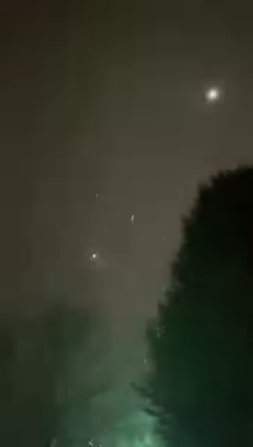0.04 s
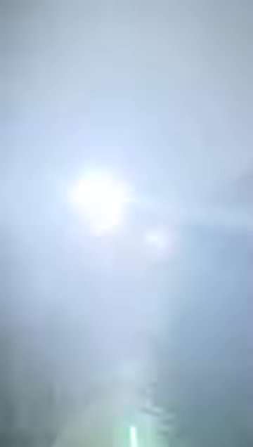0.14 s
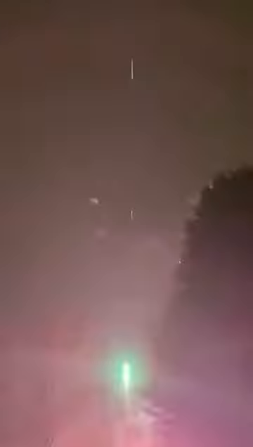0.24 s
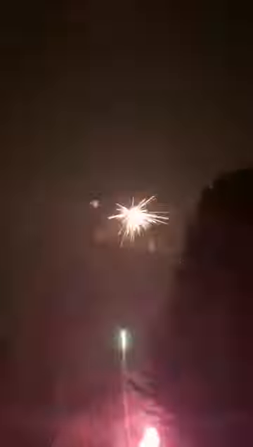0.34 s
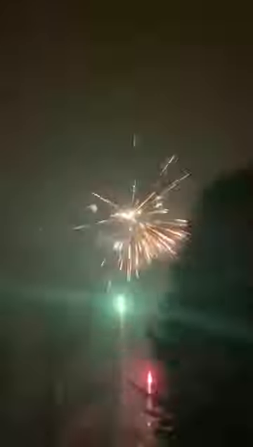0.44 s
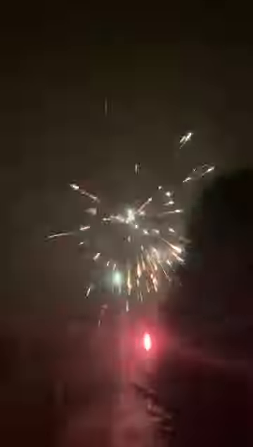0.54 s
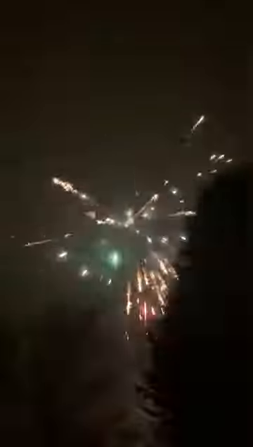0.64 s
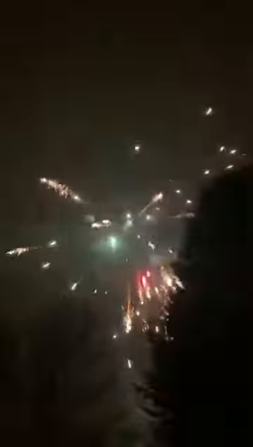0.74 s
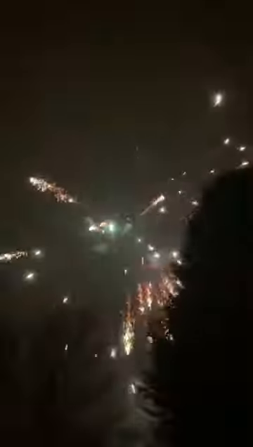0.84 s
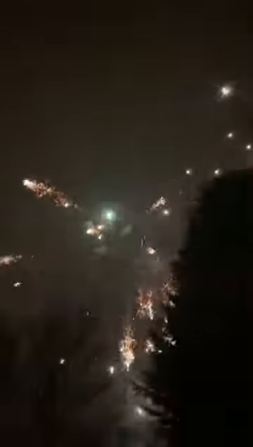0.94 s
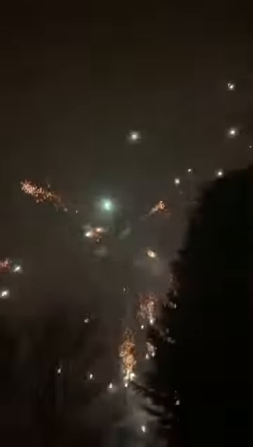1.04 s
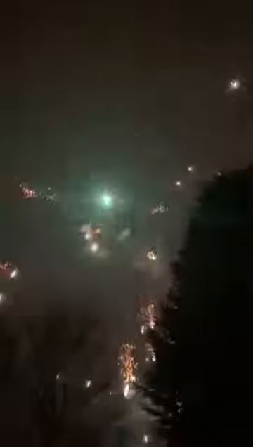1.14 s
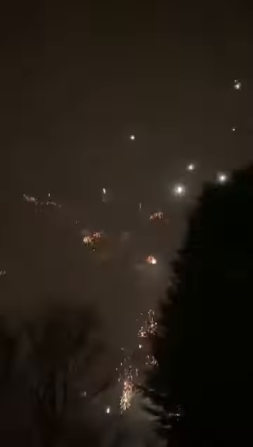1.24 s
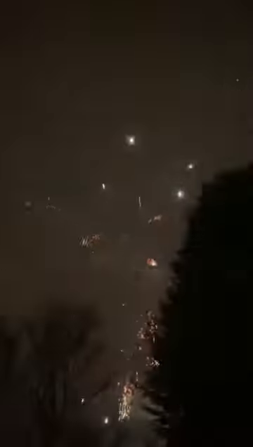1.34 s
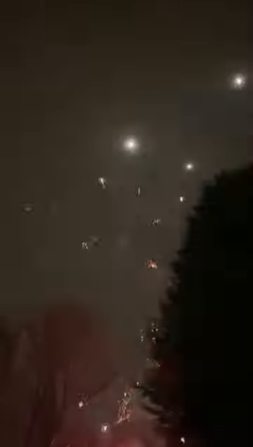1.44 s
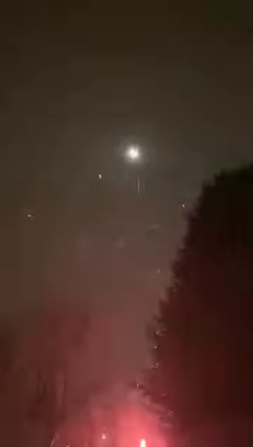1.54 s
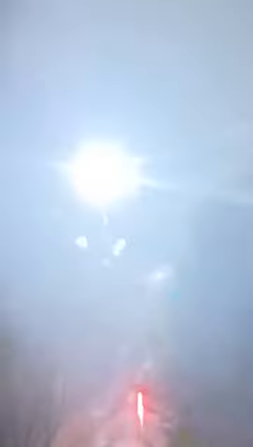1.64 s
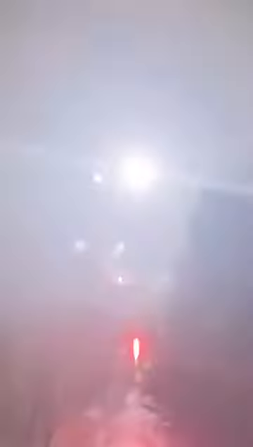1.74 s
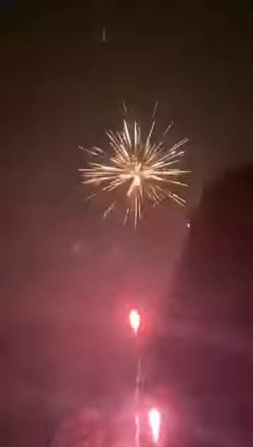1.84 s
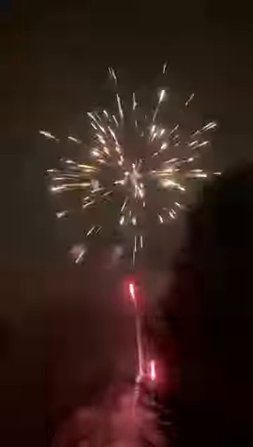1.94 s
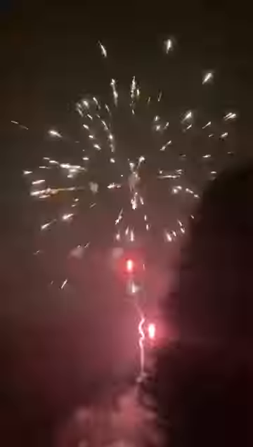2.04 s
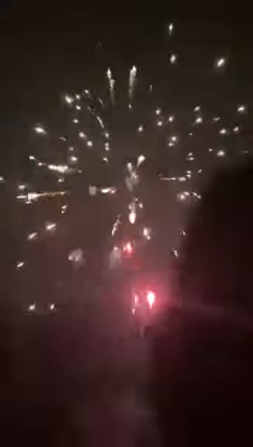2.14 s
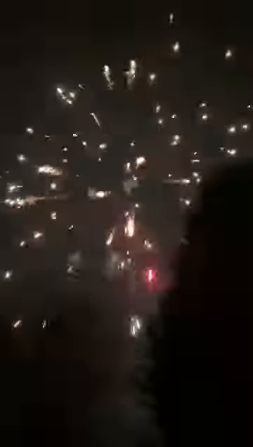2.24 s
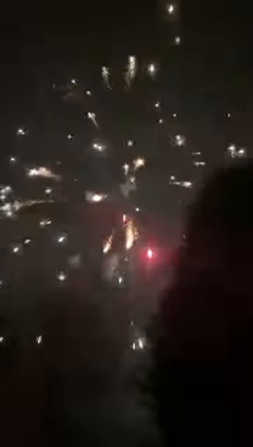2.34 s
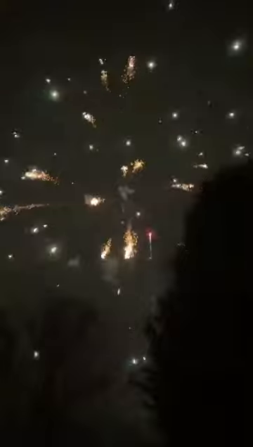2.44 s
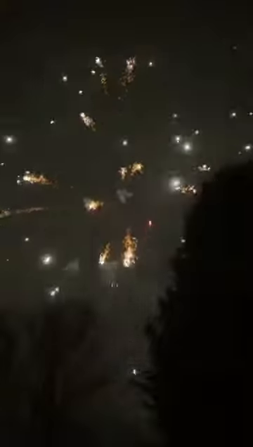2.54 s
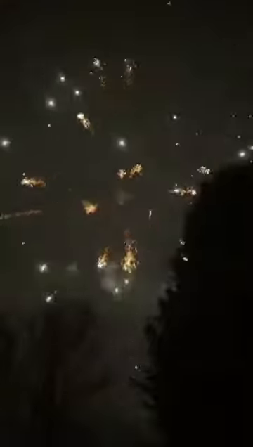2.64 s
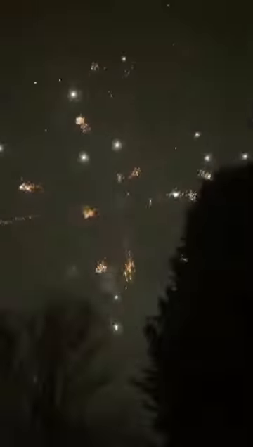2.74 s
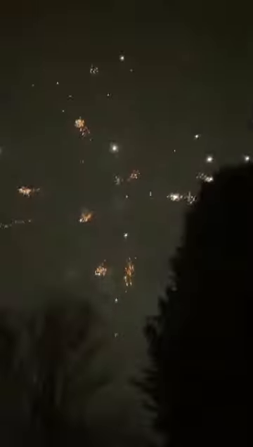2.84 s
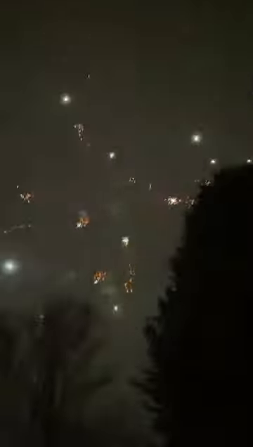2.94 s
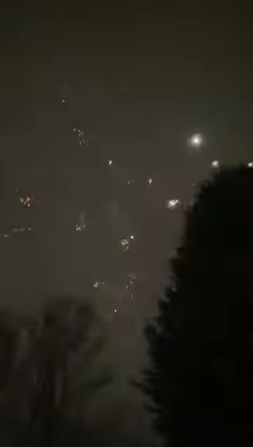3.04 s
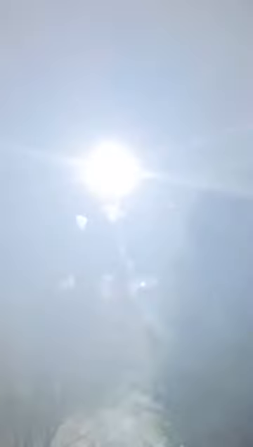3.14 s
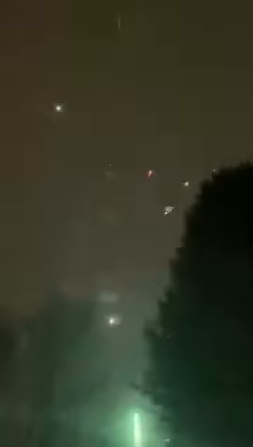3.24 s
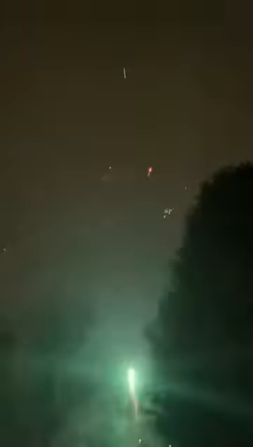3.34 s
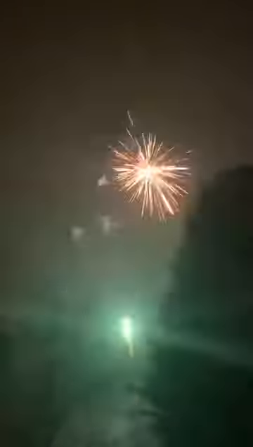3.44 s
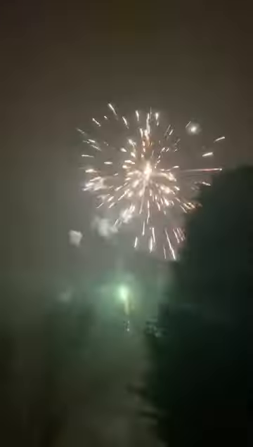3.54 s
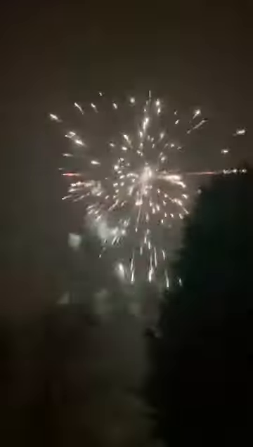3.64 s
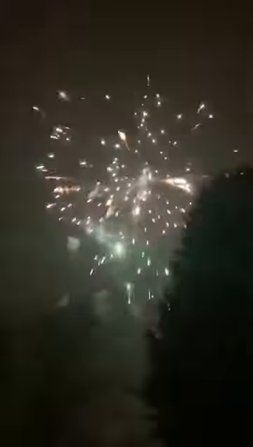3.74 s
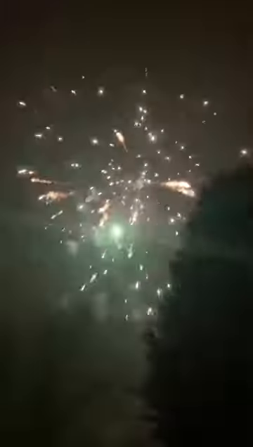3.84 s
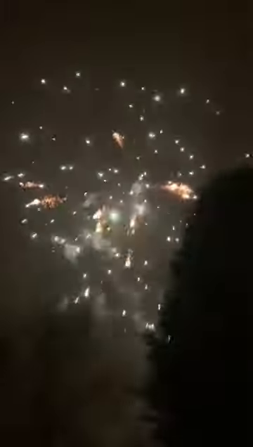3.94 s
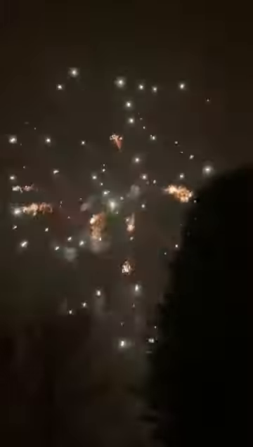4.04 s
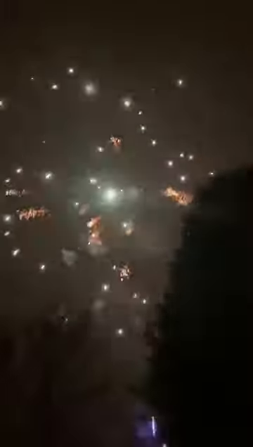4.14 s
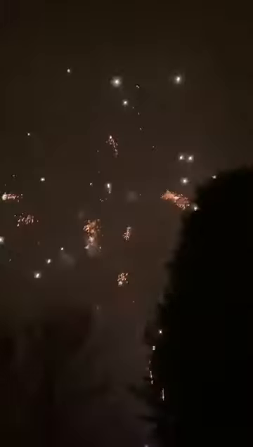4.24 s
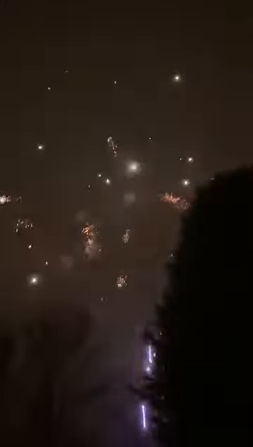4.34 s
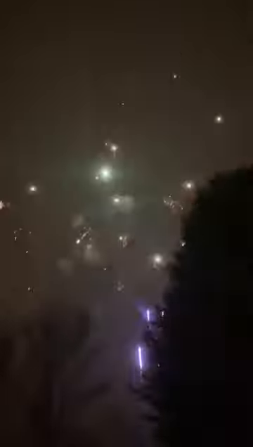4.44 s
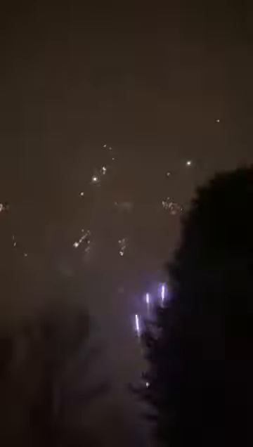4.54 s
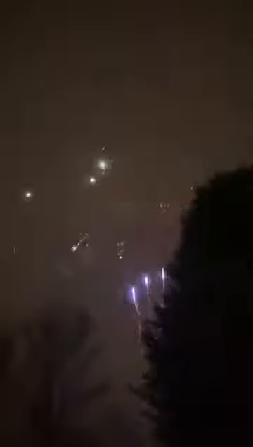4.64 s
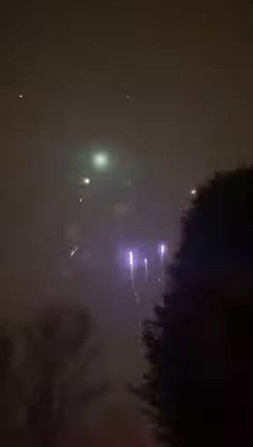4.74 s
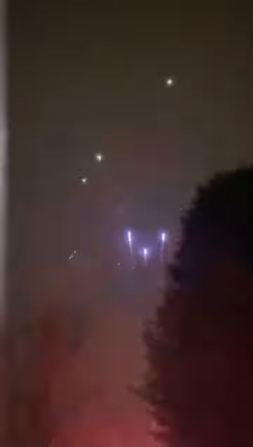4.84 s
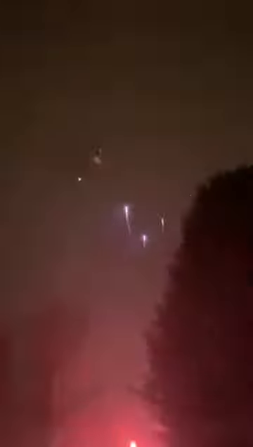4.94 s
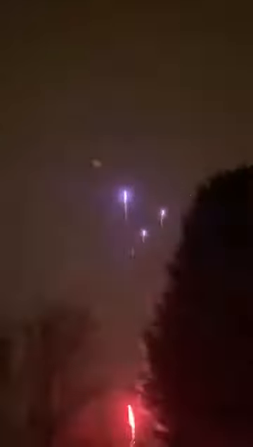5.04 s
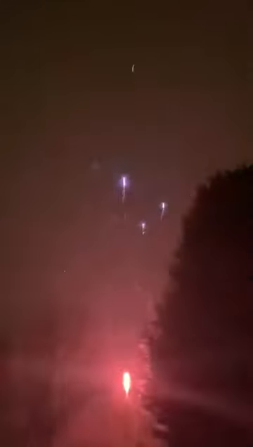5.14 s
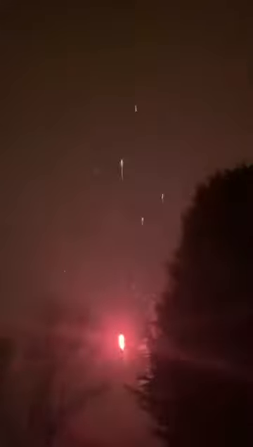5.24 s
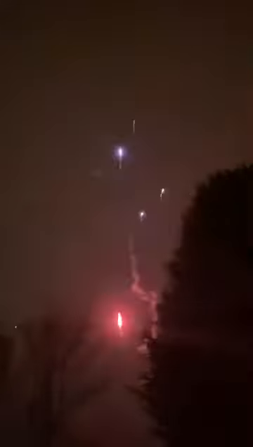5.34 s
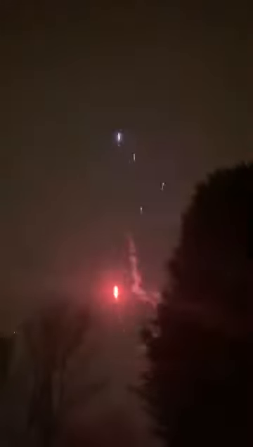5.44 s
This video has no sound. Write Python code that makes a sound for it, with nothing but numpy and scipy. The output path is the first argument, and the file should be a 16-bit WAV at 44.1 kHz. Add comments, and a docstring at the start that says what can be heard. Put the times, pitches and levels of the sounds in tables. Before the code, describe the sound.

Phone recording outdoors among houses and trees: dull launch thumps with short gassy whooshes, and loud, clipped shell bursts mostly in quick twos. Booms and slaps come back from house fronts, with hiss off foliage. Fainter knocking pops fill gaps, dry ticks of burning stars appear mid-way, a flurry of launches precedes the final bang, and two distant pops end it over low rumble.

```python
"""The echo of an earlier burst dies away over a far rumble as a firing tube thumps and a shell bursts overhead.
A night barrage of small fireworks in a garden, heard by a phone with two microphone ports: thumps and bursts
are pressure pulses with reflections, weaker pops come from farther off, burning stars snap as short noise.
Houses and trees throw each blast back as decaying thuds and hiss. The phone's band-splitting filters
smear every blast into a falling chirp."""
import sys
import numpy as np
from scipy import signal
from scipy.fft import rfft, irfft, next_fast_len
from scipy.io import wavfile
from scipy.ndimage import uniform_filter1d

SR = 44100
rng = np.random.default_rng(int(sys.argv[2]) if len(sys.argv) > 2 else 0)


def to_wav(sig):
    """Store sig (one row per channel, or 1-D mono) as 16-bit WAV at the path in sys.argv[1].

    Samples outside -1..1 are clipped; the rate is SR.
    """
    pcm = np.clip(np.atleast_2d(sig), -1, 1) * 32767
    pcm = np.round(pcm).astype(np.int16)
    wavfile.write(sys.argv[1], SR, pcm.T)  # frames by channels


N = 241668

# Hiss off foliage against the thuds off walls. In order: bursts, lifts, pops, each in dB.
LEAVES_DB = [-6.5, -11.5, -18.5]


def amp(db):
    """dB to gain."""
    return 10 ** (np.asarray(db) / 20)


def read(points, hz):
    """Reads a spectrum on a log-frequency axis."""
    f, value = np.transpose(points)
    return np.interp(np.log(hz + 1), np.log(f + 1), value)


def shape(x, gain):
    """Filters by a function of frequency, with padding so that the end does not wrap round."""
    size = next_fast_len(x.shape[-1] + 4096)
    hz = np.fft.rfftfreq(size, 1 / SR)
    return irfft(rfft(x, size) * gain(hz), size)[..., :x.shape[-1]]


def coloured(shared_and_gap, colour):
    """Gives a shared and a differing signal one colour at rms 1, then scales what the spaced ports hear apart."""
    # The differing part against the shared. Each row: frequency in Hz, level in dB.
    port_gap = [(60, -38.5), (140, -64), (240, -22.5), (420, -8), (740, -3.5), (1300, -5), (3000, -1),
                (6000, -5.5), (9000, 3.5), (10500, -43)]
    x = shape(shared_and_gap, lambda hz: amp(read(colour, hz)))
    shared, gap = x / np.sqrt(np.mean(x ** 2, 1, keepdims=True))
    return np.array([shared, shape(gap, lambda hz: amp(read(port_gap, hz)))])


def add(mix, s, sound):
    """Mixes a sound in at time s."""
    part = mix[:, round(s * SR):][:, :sound.shape[1]]
    part += sound[:, :part.shape[1]]


def night():
    """A low rumble of far fireworks: coloured noise whose level wavers by about a dB."""
    # Far rumble before scaling. Each row: frequency in Hz, level in dB.
    rumble = [(18, -36), (30, -4.5), (124, 2), (258, 1), (458, -0.5), (800, -15.5), (3300, -26),
              (6000, -33.5), (11000, -47)]
    rumble_db = -54.5
    swell = uniform_filter1d(uniform_filter1d(rng.standard_normal(N), 2000), 2000)
    level = amp(rumble_db + swell / swell.std())
    return level * coloured(rng.standard_normal((2, N)), rumble)


def echoes(near_db, far_db, leaves_db, spread_db=2.5, per_s=1100, patchy_db=1.0):
    """A quick scatter from the garden, then the far houses: uneven thuds off walls, smooth hiss off foliage."""
    # Thuds off walls. Each row: frequency in Hz, level in dB.
    scatter = [(25, -9.5), (50, -1), (100, 0), (300, 1), (650, -4), (1000, -15.5), (2200, -21), (5000, -43),
               (12000, -74)]
    # Hiss off foliage before scaling. Each row: frequency in Hz, level in dB.
    leaves = [(300, -2), (800, -2.5), (2200, -6), (5000, -10.5), (10000, -21.5), (12000, -16.5)]
    # Treble lost to the air on the way. Each row: frequency in Hz, dB lost per second of travel.
    air_loss = [(200, 8), (1000, 5), (4000, 12.5), (12000, 19)]
    near_t60 = 0.16  # s
    # hedges answer at once and fade fast; the street joins later and rolls away slowly
    hedge_db, hedge_t60 = 3, 0.54  # dB against far_db, s
    street_s, street_rise_s, street_db, street_t60 = 0.11, 0.052, -4.5, 1.88

    t = np.arange(round(1.5 * SR)) / SR
    sign, chance, size = rng.random((3, 2, len(t)))
    sparse = chance < per_s / SR
    taps = np.sign(sign - .5) * sparse * amp(-spread_db * np.log(size + .02))
    thuds = coloured(taps, scatter)
    hiss = amp(leaves_db) * coloured(rng.standard_normal((2, len(t))), leaves)

    hz, frame_s, z = signal.stft(thuds + hiss, SR, nperseg=512)
    # each clump of trees returns its own band for a moment
    patches = uniform_filter1d(rng.standard_normal(z.shape[1:]), size=8, axis=0)
    patches = uniform_filter1d(patches, size=3, axis=1)
    gain_db = patchy_db * patches / patches.std() - read(air_loss, hz)[:, None] * frame_s
    tail = signal.istft(z * amp(gain_db), SR, nperseg=512)[1][:, :len(t)]

    street_rise = np.clip((t - street_s) / street_rise_s, 0, 1)
    street = street_rise * amp(street_db - 60 * (t - street_s) / street_t60)
    far = amp(far_db) * np.hypot(amp(hedge_db - 60 * t / hedge_t60), street)
    near = amp(near_db - 60 * t / near_t60)
    rise = np.minimum(t / .008, 1)
    return tail * np.hypot(near, far) * rise


def earlier_burst(mix):
    """An earlier burst is still dying away: an echo joined 0.3 s after its start."""
    add(mix, 0, echoes(-60, -32.5, -3.0)[:, round(.3 * SR):])


def blast(peak_db, corner_hz, bearing, kind, walls=(), lead=.02, front_s=0.003):
    """A short pressure pulse and its first reflections; arriving aslant, it differs in phase between the ports."""
    # Pulse spectrum before its corners and scaling. Each row: frequency in Hz, level in dB.
    pulse_colour = [(20, -15), (45, 6), (80, 13.5), (300, 13), (1000, 3), (1600, 2.5), (2300, 1.5),
                    (3000, -2), (3800, -1.5), (5000, -1.5), (9000, -2.5), (13000, 5.5)]
    # Port difference of the direct sound, before bearing. Each row: frequency in Hz, level in dB.
    direct_gap = [(60, -44.5), (140, -33.5), (300, -18), (740, -16), (1500, -16.5), (2300, -9), (4000, -14),
                  (6500, -4), (12000, -6)]
    bass_hz, slope, ragged_db = kind
    t, hz = np.arange(8192) / SR, np.fft.rfftfreq(8192, 1 / SR)

    treble_cut = (1 + (hz / corner_hz) ** 2) ** slope
    bass_cut = hz ** 2 / (hz ** 2 + bass_hz ** 2)
    pulse = amp(read(pulse_colour, hz)) / treble_cut * bass_cut
    pulse = pulse * amp(peak_db) / irfft(pulse)[0]

    # turbulence and the nearest surfaces break the front into a spray of small arrivals
    spray = rng.standard_normal((2, len(t))) * np.exp(-t / front_s)
    ragged = amp(ragged_db) * rfft(spray / np.linalg.norm(spray[0])) * hz / np.hypot(hz, 1200)

    duller = 1 / (1 + (hz / (corner_hz * 0.74)) ** 2) ** 0.16
    reflections = sum(sign * amp(db) * np.exp(-2j * np.pi * hz * s) for s, db, sign in walls)
    paths = 1 + ragged + duller * reflections
    # the differing part is turned by nearly a quarter cycle
    gap = np.exp(1.45j) * bearing * 2 * amp(read(direct_gap, hz))
    delay = np.exp(-2j * np.pi * hz * lead)
    return irfft(-pulse * paths * delay * [np.ones(len(hz)), gap])


def fire(mix, s, peak_db, corner_hz, bearing, pulse, walls, near_db, far_db, leaves_db):
    """One blast and what the garden returns of it; echo levels are against the peak."""
    add(mix, s - .02, blast(peak_db, corner_hz, bearing, pulse, walls))  # takes off the pulse's lead
    add(mix, s, echoes(peak_db + near_db, peak_db + far_db, leaves_db))


def puff(colour, db, t60, rise_s):
    """Coloured noise that swells quickly and dies away."""
    t = np.arange(round(.7 * SR)) / SR
    level = amp(db - 60 * t / t60) * np.minimum(t / rise_s, 1) ** 2
    return coloured(rng.standard_normal((2, len(t))), colour) * level


def lifts(mix):
    """Lift charges thump in the tubes: a dull pulse, then hot gas rushing out as noise."""
    # Each row: time in seconds, pulse peak in dB, jet level in dB, jet tilt in dB per octave,
    # far echo in dB against the peak.
    charges = [(0.1402, -14.5, -44.5, 3.5, -21), (1.3562, -17, -40, 2.5, -33),
               (1.6174, -13.5, -39.5, 6.5, -21.5), (3.034, -16.5, -39, 4, -25),
               (3.9376, -13.5, -38, 6.5, -26), (3.9936, -15, -40, 3.9, -41), (4.0409, -18.5, -42, -8, -45),
               (4.093, -24.5, -59, -2, -41), (4.337, -26, -55, -5, -27.5), (4.7031, -19, -43, 2.2, -23.5)]
    # First reflections from ground and walls. Each row: delay in seconds, gain in dB, signed factor.
    lift_walls = [(.0024, -9.5, 0.99), (.0067, -3.5, 0.97), (0.0166, -5, 0.65), (0.0226, -15, 0.87)]
    # Gas jet before tilt and scaling. Each row: frequency in Hz, level in dB.
    jet = [(200, -38), (700, 5), (1300, 10), (3000, -0.5), (6000, -9), (10000, -20), (13000, -16)]
    # In order: bass corner in Hz, treble slope exponent, ragged spray in dB.
    lift_pulse = (70, 1.32, -15.5)
    corner_hz, bearing, near_db, jet_t60 = 400, 0.059, -22, 0.45  # Hz, 0 is straight ahead, dB, s
    for s, peak_db, jet_db, tilt_db, far_db in charges:
        fire(mix, s, peak_db, corner_hz, bearing, lift_pulse, lift_walls, near_db, far_db, LEAVES_DB[1])
        colour = [(hz, level + tilt_db * np.log2(hz)) for hz, level in jet]
        add(mix, s - .001, puff(colour, jet_db, jet_t60, 0.0006))


def bursts(mix):
    """Shells burst overhead: a loud pulse, a deep boom off the street and single slaps off the houses."""
    # Each row: time in seconds, pulse peak in dB, bearing (0 is straight ahead),
    # near scatter in dB against the peak.
    shells = [(0.2056, 10, .95, -29), (0.3991, 9, 1, -29), (1.7039, 10, 0.47, -27),
              (1.8452, 9.5, 0.54, -25.5), (3.2052, 9.5, 0.98, -33), (3.4908, 9.5, 0.8, -27),
              (4.9581, 8.5, 0.55, -28.5)]
    # First reflections from ground and walls. Each row: delay in seconds, gain in dB, signed factor.
    burst_walls = [(.0035, -16.5, 1), (.0085, -16.5, 1), (0.0127, -20, 1), (.017, -14, -0.94),
                   (.024, -33.5, 1), (.032, -39, -0.77)]
    # House fronts, before each slap's own spread. Each row: delay in seconds, level in dB against the burst.
    houses = [(0.152, -36), (.187, -32), (.227, -30.5), (.28, -33.5)]
    # Street boom before scaling. Each row: frequency in Hz, level in dB.
    boom = [(25, -16), (50, 4), (75, -12), (150, -58.5)]
    # Burst and slap, each in order: bass corner in Hz, treble slope exponent, ragged spray in dB.
    burst_pulse = (6.6, 0.74, 0)
    slap_pulse = (30, 1.2, -8)
    corner_hz, far_db = 960, -38
    boom_s, boom_db, boom_t60, boom_rise_s = 0.1025, -53, 0.38, 0.085  # delay, dB against the burst, s, s
    slap_hz, slap_bearing = 700, .3
    slap_spread_s, slap_spread_db = .003, 2.5  # each shell bursts at its own spot

    for s, peak_db, bearing, near_db in shells:
        fire(mix, s, peak_db, corner_hz, bearing, burst_pulse, burst_walls, near_db, far_db, LEAVES_DB[0])
        add(mix, s + boom_s, puff(boom, peak_db + boom_db, boom_t60, boom_rise_s))
        spots = rng.uniform(-1.036, 1, (len(houses), 2))
        for (delay, db), (shift, loud) in zip(houses, spots):
            slap_db = peak_db + db + slap_spread_db * loud
            slap = blast(slap_db, slap_hz, slap_bearing, slap_pulse)
            add(mix, s + delay + slap_spread_s * shift - .02, slap)


def pops(mix):
    """Weaker pops from farther off: a dull pulse, followed by a bright, hollow knock of coloured noise."""
    # Each row: time in seconds, pulse peak in dB, treble corner in Hz, knock level in dB,
    # near scatter in dB against the peak.
    far_pops = [(0.8755, -13, 654, -41, -16), (1.143, -12, 775, -32.5, -23),
                (1.3405, -13, 709, -35.5, -16.5), (4.3229, -19, 505, -42, -17),
                (5.3133, -12, 910, -28.5, -31), (5.401, -16.5, 596, -33, -14.5)]
    # First reflections from ground and walls. Each row: delay in seconds, gain in dB, signed factor.
    pop_walls = [(.0075, -16, -1.2), (.0088, -7.5, 0.91), (0.015, -13.5, 1), (0.073, -11.5, 0.88)]
    # Hollow knock before scaling. Each row: frequency in Hz, level in dB.
    knock = [(500, -17), (1050, 3.5), (1350, 2.5), (1700, -4), (2100, 3), (2600, -15), (3000, 3),
             (3500, -15.5), (6000, -26), (12000, -75)]
    # In order: bass corner in Hz, treble slope exponent, ragged spray in dB.
    pop_pulse = (60, 1, 0)
    bearing, far_db, knock_t60 = .4, -26, 0.058  # 0 is straight ahead, dB, s
    for s, peak_db, corner_hz, knock_db, near_db in far_pops:
        fire(mix, s, peak_db, corner_hz, bearing, pop_pulse, pop_walls, near_db, far_db, LEAVES_DB[2])
        add(mix, s, puff(knock, knock_db, knock_t60, 0.0053))


def crackle():
    """Burning stars snap: clicks of white noise that decay in a fraction of a millisecond."""
    # Each row: time in seconds, starting level in dB.
    snaps = [(1.2499, -40), (2.263, -48), (2.2741, -33.5), (2.321, -31.5), (2.4457, -40.5), (2.482, -44)]
    out, t = np.zeros((2, N)), np.arange(90) / SR
    for s, db in snaps:
        click = amp(db) * np.exp(-t / 0.00042) * rng.standard_normal(len(t))
        add(out, s, click * [[1], [.4]])  # stronger on the left
    return out


def scene():
    """All blasts with their echoes; left and right are the shared part plus and minus the differing part."""
    mix = night() + crackle()
    earlier_burst(mix)
    lifts(mix)
    bursts(mix)
    pops(mix)
    shared, gap = mix
    return np.array([shared + gap, shared - gap])


def record(dry):
    """The finish: the shared treble drops out in one band near 7.5 kHz, then the phone's roll-off,
    all-passes delaying the bass most, overload, band limit."""
    # Crossovers of the band splitter, each in Hz.
    split_hz = [55, 122, 225, 455, 810]
    # Microphone roll-off. Each row: frequency in Hz, gain in dB.
    treble = [(10500, 0.5), (11500, -5.5), (12000, -26), (12800, -33)]
    null_hz, null_width_hz, null_db, edge_hz = 7450, 1000, -30, 12640

    def null(hz):
        """What to add to the shared part so that it drops out in one band."""
        return amp(null_db * np.exp(-((hz - null_hz) / null_width_hz) ** 4)) - 1

    def phone(hz):
        """Roll-off, and one second-order all-pass for each crossover."""
        pole = np.prod([f ** 2 - hz ** 2 + 1j * np.sqrt(2) * f * hz for f in split_hz], axis=0)
        return amp(read(treble, hz)) * np.conj(pole) / pole

    x = dry + shape(dry.mean(0), null)
    x = np.clip(shape(x, phone), -.96, .96)
    band_limit = signal.firwin(511, edge_hz, window=("kaiser", 12), fs=SR)
    return signal.oaconvolve(x, band_limit[None], "same")


dry = scene()
out = record(dry)
to_wav(out)
```